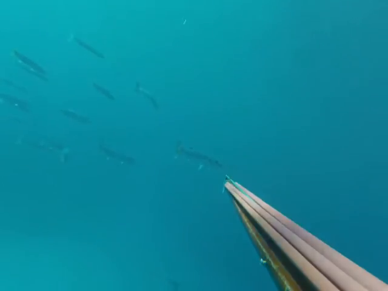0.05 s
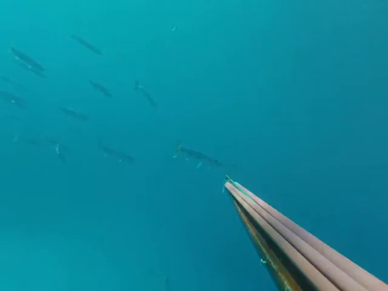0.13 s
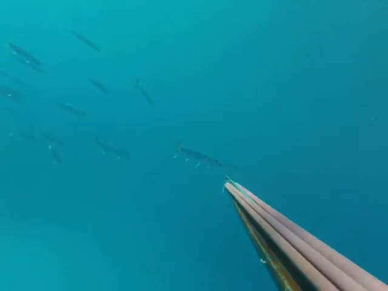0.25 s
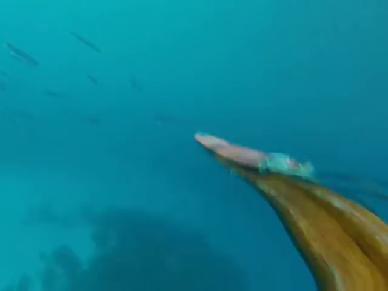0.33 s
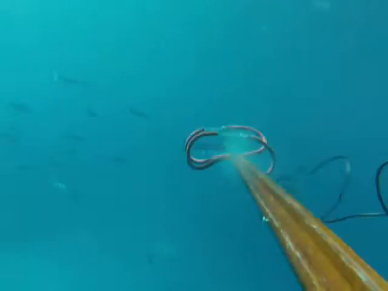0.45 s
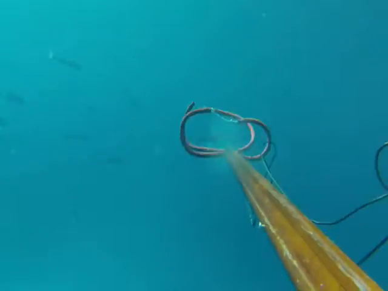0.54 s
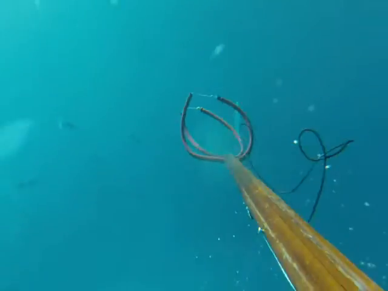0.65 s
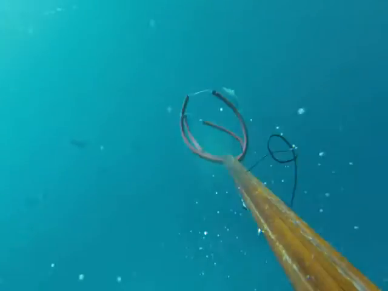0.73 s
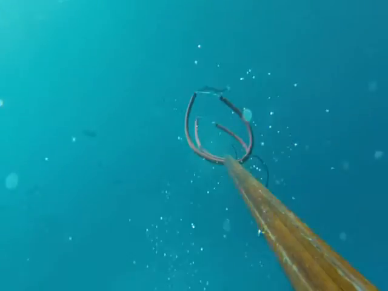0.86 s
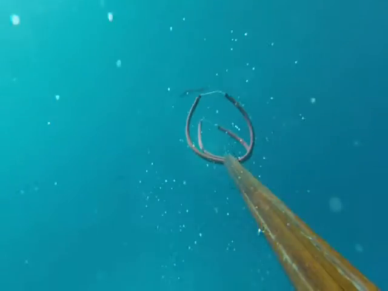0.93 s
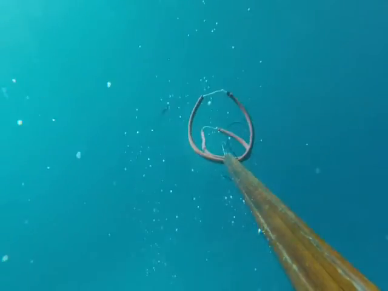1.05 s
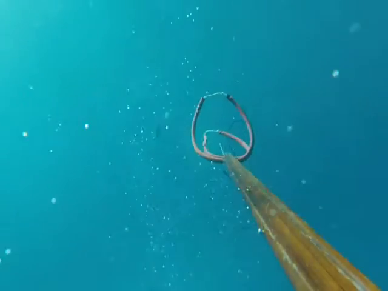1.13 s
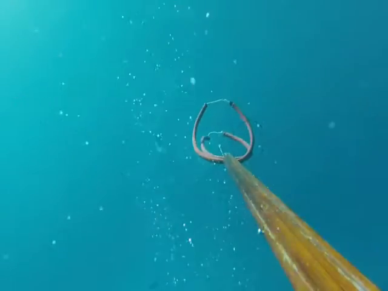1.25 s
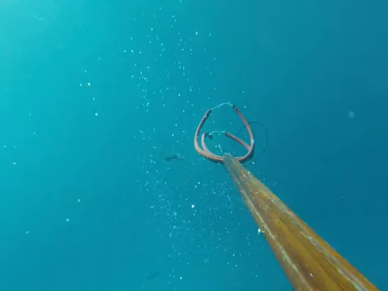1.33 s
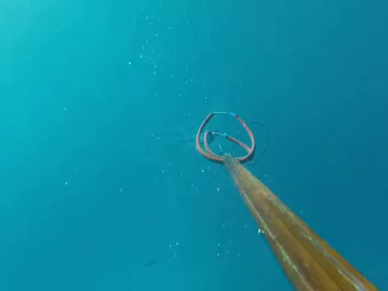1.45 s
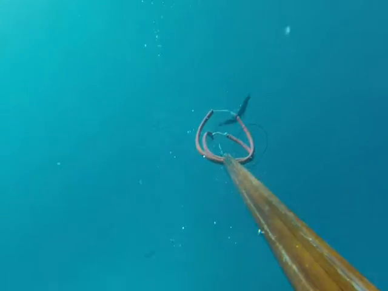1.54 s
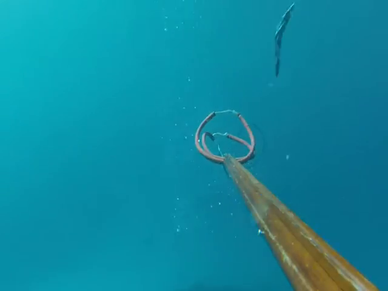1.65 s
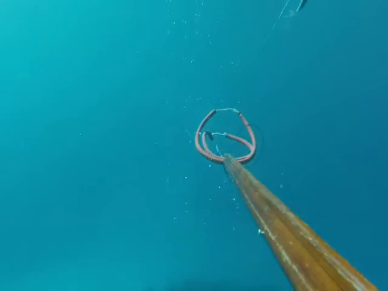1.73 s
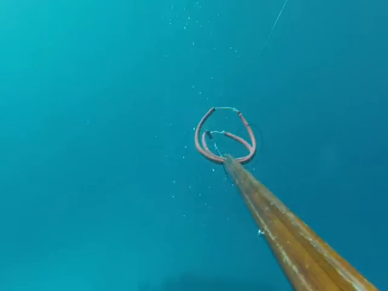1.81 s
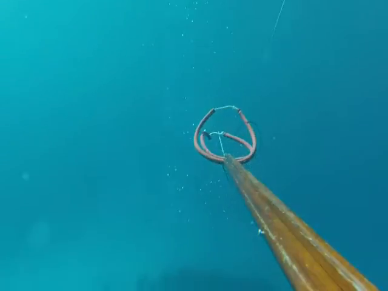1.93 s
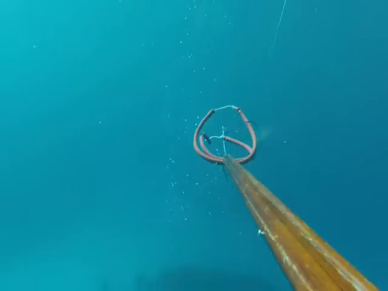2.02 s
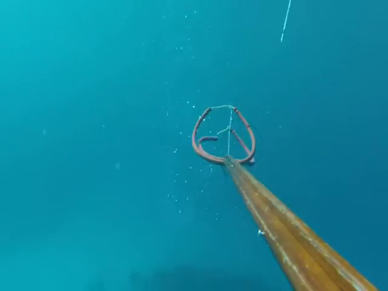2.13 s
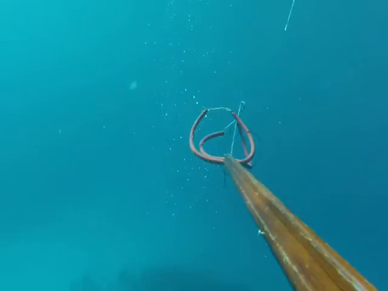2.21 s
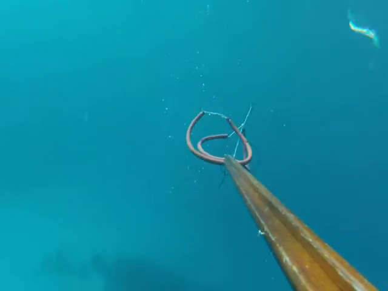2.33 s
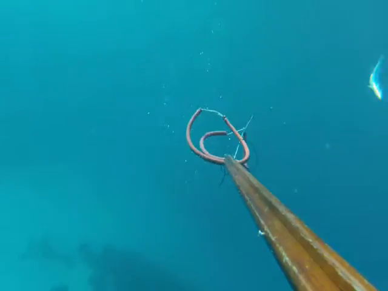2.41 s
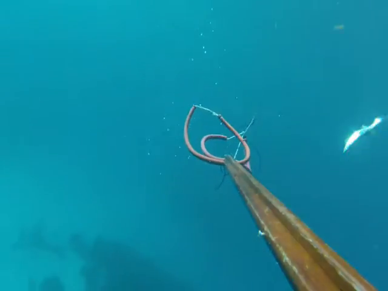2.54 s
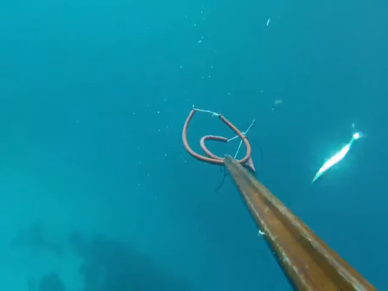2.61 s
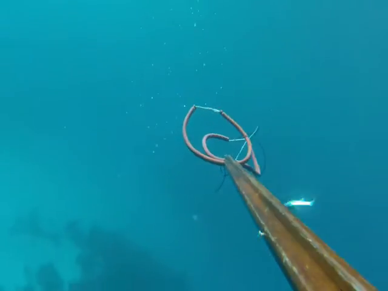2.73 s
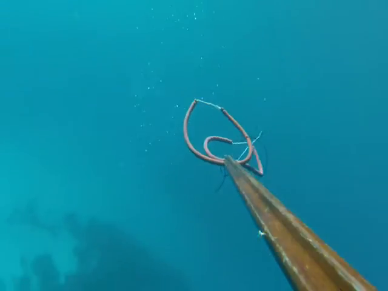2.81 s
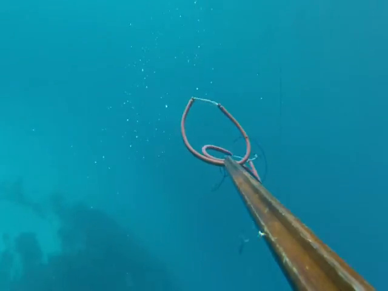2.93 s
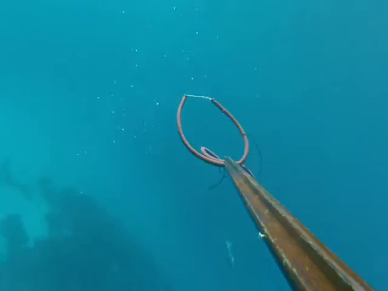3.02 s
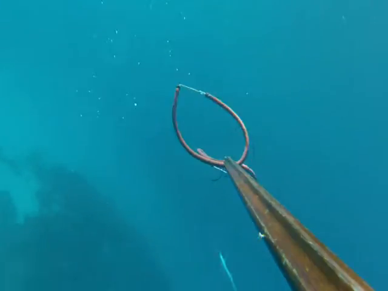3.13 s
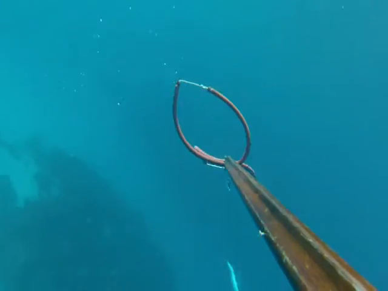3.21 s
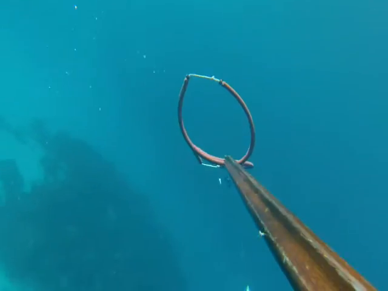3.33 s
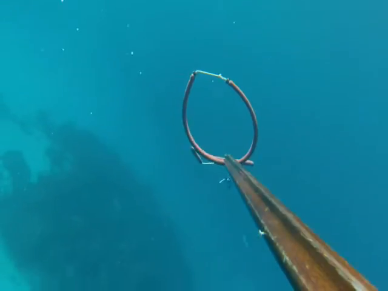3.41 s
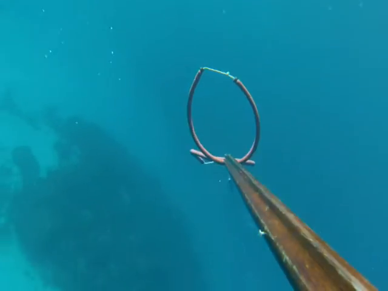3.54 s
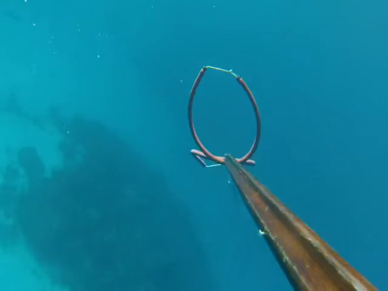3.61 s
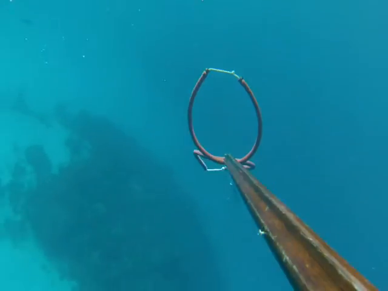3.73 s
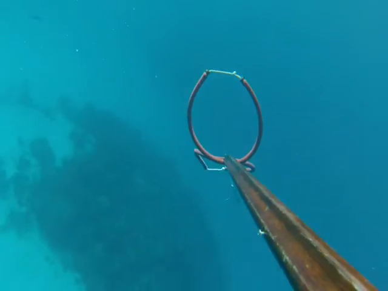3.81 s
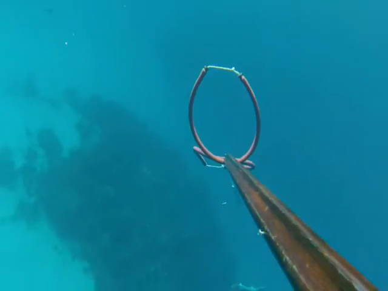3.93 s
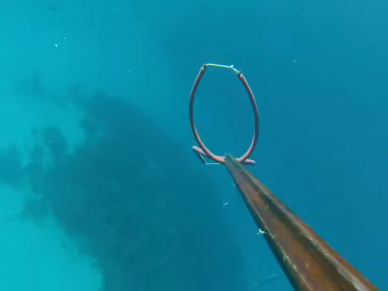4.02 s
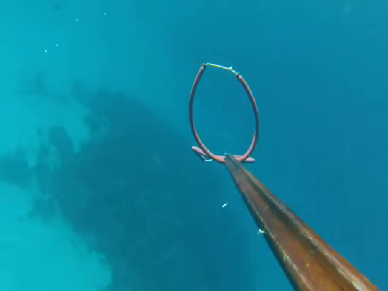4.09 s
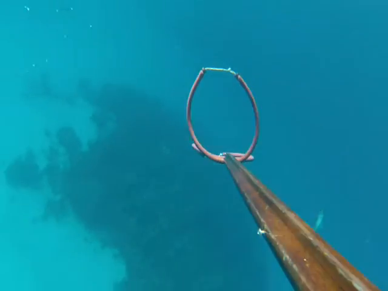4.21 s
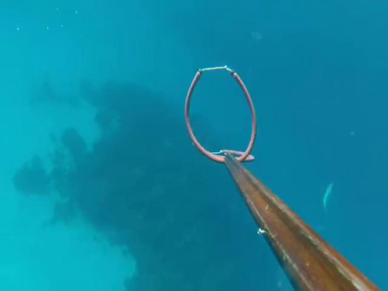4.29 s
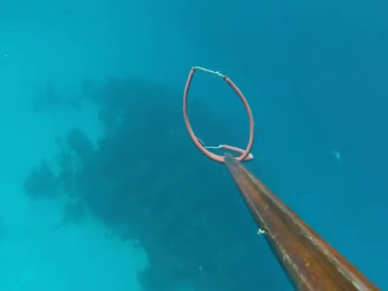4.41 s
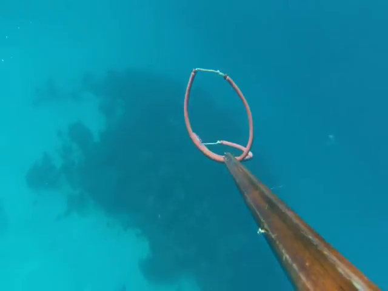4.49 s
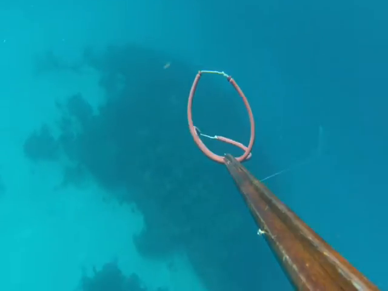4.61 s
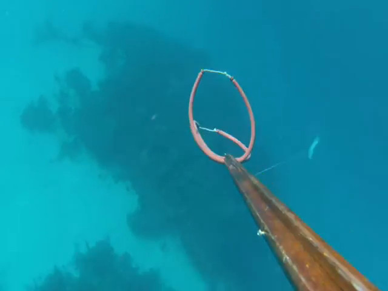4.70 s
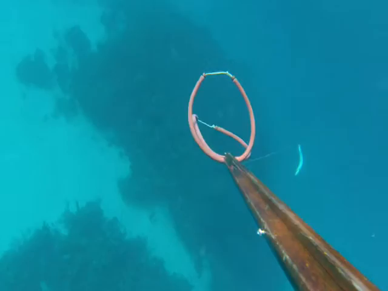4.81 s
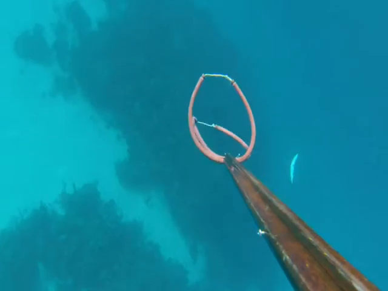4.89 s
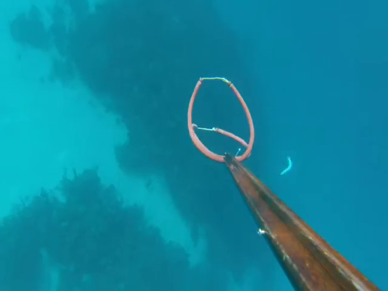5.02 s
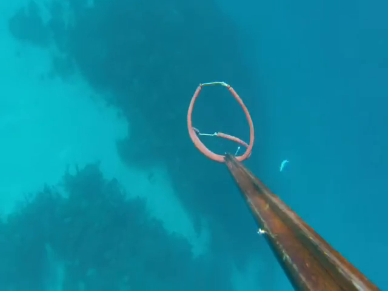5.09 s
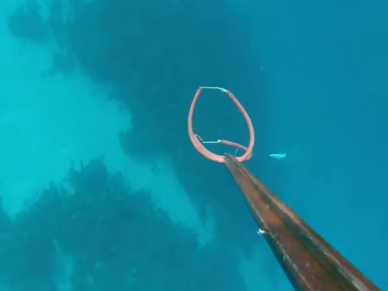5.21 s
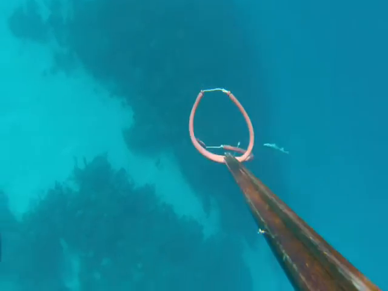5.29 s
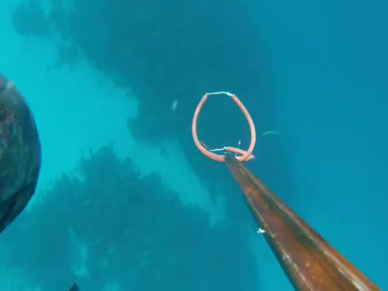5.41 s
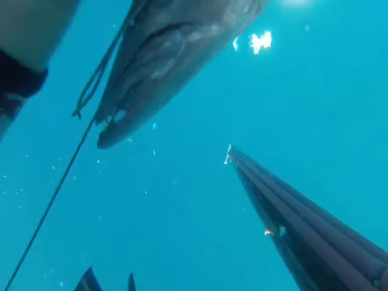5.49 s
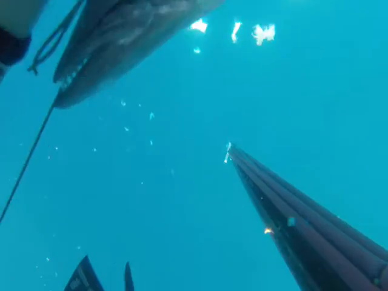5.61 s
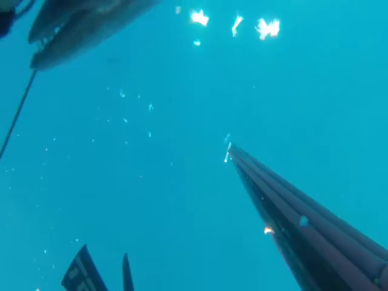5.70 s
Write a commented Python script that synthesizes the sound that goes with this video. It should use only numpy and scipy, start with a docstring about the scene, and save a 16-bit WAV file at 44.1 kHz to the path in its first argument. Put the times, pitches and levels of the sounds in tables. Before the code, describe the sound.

The sound is underwater, picked up from a sealed housing clamped to a speargun's wooden barrel. It opens with faint hiss and a few small dry ticks. At about 0.5 seconds the gun fires: one sharp crack with a deep recoil thump, by far the loudest moment, briefly overloading the microphone. Until about 1.2 seconds the line rattles and chafes on the gun in close, boxy knocks, over a low barrel hum, a wobbling rumble and a faint fizz of bubbles. Sparser knocks and ticks follow, with the hum swelling again near 2.4 seconds. From about 3 to 3.4 seconds comes a stronger cluster of tugs, knocks and rumble. Wet rubber squeaks once, faintly, at 3.6 seconds. Then things settle to light taps, soft scraping and low rumble, and a brief, soft rush of water passes at around 5.6 seconds.

```python
"""A rubber-band speargun fires under water with a sharp crack, heard from on the gun itself: the microphone
is in a camera, in a sealed housing clamped to the wooden barrel. The recoil overloads it and the gain
ducks. Afterwards the line tugs, knocks and chafes on the gun, ringing the housing; the barrel hums and
wobbles. Fine bubbles fizz, wet rubber squeaks once and water rushes past at the end.
Small dry ticks stand out of the hiss of sea and amplifier."""
import sys
import numpy as np
from scipy import signal
from scipy.fft import rfft, irfft
from scipy.io import wavfile
from scipy.ndimage import uniform_filter1d

SR = 44100
rng = np.random.default_rng(int(sys.argv[2]) if len(sys.argv) > 2 else 0)


def dump_mix(stems):
    """Bounce the given channels to the path in sys.argv[1] as a 16-bit WAV at rate SR."""
    frames = np.atleast_2d(stems).T  # one column per channel
    limited = np.clip(frames, -1, 1)  # hard clip at full scale
    pcm = np.round(limited * 32767).astype(np.int16)
    wavfile.write(sys.argv[1], SR, pcm)


N = 253575

# swings of the whole gun (start [s], frequency [Hz], level [dB], t60 [s])
RECOIL_SWINGS = [(0.4889, 100, 8.5, 0.026), (0.4935, 30.5, -7.5, 0.14), (0.541, 161, -15, 0.1)]
# the shot's sharp crack (first row), then clouds of fine fizz
# (start [s], length [s], level [dB], fade [dB/s], metallic ring [dB re level])
CRACK_AND_FIZZ = [(0.4885, 0.0045, -25.5, 1003, -3), (0.492, 0.015, -44.5, 178, -4),
                  (0.926, 0.088, -68.5, 302.5, 7.5), (1.03, 0.065, -67.5, 298.5, 7),
                  (3.318, 0.012, -58, 244, -1)]
# the shot's double crack (0.4905 and 0.4992 s), and small dry ticks
# (time [s], level at 6 kHz [dB], tilt [dB/octave])
CRACK_AND_TICKS = [(.1205, -39.5, -5.5), (0.1249, -41.5, -5), (0.265, -43, 1), (.318, -54, -9),
                   (0.4905, -7, -10.5), (0.4992, -20.5, -5), (.5817, -39.5, 3.5), (0.6693, -32, -4.5),
                   (0.8147, -39.5, -3), (0.919, -50.5, -2.5), (0.938, -47, -4.5), (0.968, -52.5, -9.5),
                   (.992, -51, -0.5), (1.881, -45.5, 10.5), (1.9423, -48.5, -2), (2.379, -36, 1),
                   (2.4, -43.5, 0.5), (2.5735, -47, -5.5), (2.763, -40.5, 6), (2.9004, -45, 11.5),
                   (3.0199, -46.5, -4.5), (3.194, -40.5, -5), (3.2327, -40, -5), (3.3138, -43, 0.5),
                   (3.8162, -45.5, -1), (4.595, -45.5, 13), (4.8005, -37, -8), (5.4798, -50, 6)]
# knocks on the gun
# (time [s], relative strength [dB], upper modes [dB re strength], deep modes [same], contact [ms])
GUN_KNOCKS = [(0.467, -38.5, -3, -26, 13), (0.4888, -2, -4, -32, 1.65), (0.4957, -12, 3, 3, 3.5),
              (0.5063, -28, 7.5, -11, 10.5), (0.5234, -22, -17, -5, 8.4), (0.5409, -15.5, -8, -16, 1.5),
              (0.5646, -27.5, 0, -1.5, 2.1), (0.622, -36, 0.5, 2, 4.24), (0.667, -25, 0.5, -16, 1.4),
              (.698, -30.5, -9.5, -11, 3), (0.745, -42, -21, -17, 2.3), (0.7684, -27.5, -18.5, -34, 1.7),
              (0.8122, -20, -11, -30, 10.7), (0.8501, -28, -19, -13, 4.4), (0.9133, -34.5, -14, -28, 2.3),
              (0.933, -24, -14, -35, 4), (0.9686, -23.5, -19, -36, 1.9), (0.991, -31, -7, -30, 2),
              (1.057, -39.5, -10, -30, 4.3), (1.082, -22, -12, -30, 4), (1.0936, -22, -9.5, -34, 3.7),
              (1.1065, -21, -9, -39, 2.47), (1.12, -17.5, -15.5, -36, 3), (1.179, -43.5, -8.5, -18, 4.6),
              (1.38, -39.5, -5, -7, 1.1), (1.4219, -30, -7.5, -36, 1.22), (1.643, -54.5, -22, 9.5, 2),
              (1.8134, -23, -9.5, -38, 0.96), (1.995, -35.5, -28, -11, 2.8), (2.073, -33, -38.5, -20, 5),
              (2.1598, -31, -27, -9.5, 5.4), (2.3043, -36.5, -18, -18.5, 2.8),
              (2.32, -28.5, -6.5, -23, 1.3), (2.451, -25, -2, -21, 2.35), (2.465, -30, -10, -12, 5.7),
              (2.5719, -35, -7.5, -32, 3.96), (2.9722, -31, -6, -26.5, 5.6), (3.043, -16, -17, -16, 2.6),
              (3.069, -29, -19, -27, 4.6), (3.087, -30, -25, -16, 3.2), (3.184, -33, -4.5, -2, 2.9),
              (3.1911, -18.5, 2.5, -10, 1.78), (3.2009, -15.5, -12, -18, 5.1),
              (3.2341, -27.5, -11, -10.5, 6.3), (3.319, -30, -10, -15, 21), (3.3329, -24, -9.5, -9.5, 10),
              (3.6412, -38, -22.5, -27.5, 4.7), (4.5043, -43.5, -7, 2, 5.6),
              (4.5913, -40.5, -12.5, -30, 5.5), (5.1582, -38, -9.5, 1.5, 5.1), (5.515, -39, -17, -9, 1.34)]
# line chafing on the gun (start [s], length [s], relative level [dB], upper modes [dB re level])
LINE_CHAFES = [(0.508, 0.059, -28.5, -6.5), (0.561, 0.32, -44.5, -7.5), (0.928, 0.11, -32.5, -6),
               (1.093, 0.019, -27, -12), (1.128, 0.35, -52, -9), (1.51, 0.92, -57.5, -9),
               (2.049, 0.029, -35, -22.5), (2.001, 0.65, -49.5, -14.5), (2.286, 0.069, -38, -10.5),
               (2.737, 0.26, -52, -14), (2.972, 0.013, -27, -8.5), (3.032, 0.11, -40, -22),
               (3.18, 0.065, -40, -15), (3.311, 0.057, -33, -16.5), (3.368, 0.27, -44.5, -9.5),
               (4.081, 0.96, -60.5, -13.5)]
# jerks on the line (start [s], length [s], second barrel mode [dB], all modes [dB re second])
LINE_TUGS = [(0.536, 0.0083, -25, 3.5), (0.681, 0.034, -38, -9), (0.946, 0.018, -34.5, -11),
             (1.07, 0.075, -48, -4), (1.364, 0.044, -54.5, 10), (1.834, 0.015, -49, 6),
             (2.148, 0.014, -58, -3), (2.399, 0.016, -31.5, -15), (2.662, 0.011, -37, -11),
             (2.762, 0.011, -40, 0), (2.872, 0.013, -34, -9), (2.974, 0.035, -24.5, -9),
             (3.052, 0.014, -23.5, -19), (3.207, 0.036, -28, 3), (3.338, 0.029, -38, 8),
             (4.61, 0.046, -46, -17), (4.77, 0.036, -37, -21), (4.902, 0.031, -43, -20),
             (5.084, 0.052, -49, -8)]
# barrel hum under the line's steady pull (time [s], level [dB])
HUM_LEVELS = [(0, -93), (.4, -94), (.5, -28.5), (.76, -54), (.86, -35.5), (1.15, -42.5), (1.28, -59.5),
              (1.45, -50), (1.75, -73), (1.95, -58), (2.0, -46), (2.47, -37.5), (2.62, -52.5), (3.0, -42.5),
              (3.42, -43), (3.55, -52.5), (3.96, -66), (4.18, -50.5), (4.3, -59), (4.75, -53.5),
              (5.25, -63.5), (5.75, -66)]
# shaking of the gun (time [s], level [dB])
WOBBLE_LEVELS = [(0, -57), (.36, -51.5), (.49, -48), (.52, -28), (.6, -26.5), (.83, -30), (.97, -37.5),
                 (1.16, -33), (1.45, -57), (1.65, -44.5), (1.8, -54), (2.4, -35), (2.92, -46),
                 (3.14, -29.5), (3.38, -25), (3.52, -37.5), (4.0, -51.5), (4.28, -36), (4.37, -47.5),
                 (4.5, -33), (4.68, -37.5), (5.75, -53.5)]
# glide of the rubber's squeak (time [s], pitch [Hz])
SQUEAK_GLIDE = [(3.58, 2090), (3.605, 1660), (3.63, 2410)]
# thin faint tones (start [s], length [s], level [dB], pitch [Hz])
THIN_TONES = [(1.947, 0.0092, -62, 2780), (2.753, 0.21, -65, 1818)]
# sea and amplifier noise (frequency [Hz], relative density [dB])
HISS_SPECTRUM = [(18, -27.5), (30, -7), (95, -20.5), (233, -19), (426, -22), (1390, -29), (1960, -29),
                 (2540, -32), (11100, -41), (14800, -44.5), (16000, -76.5)]

# modes of the housing, barrel, ticks and fizz (frequency [Hz], gain [dB], t60 [s])
WALL_DEEP = [(903, -1, 0.024), (627, -3.5, 0.026), (358, -4.5, .03)]
WALL_LOW = [(1041.7, -2.5, 0.016), (1160.5, -4, 0.035), (1287.4, -16.5, 0.052)]
WALL_UPPER = [(1438, -1, 0.017), (1706, 2, 0.021), (1930, 2, 0.017), (2301, -2, 0.011)]   # these answer harder contacts
WALL_TREBLE = [(2970, -20.5, 0.0061), (3660, -29, 0.02), (5740, -28, 0.005), (7435, -33.5, 0.0055)]
BARREL_MODES = [(108, -11.5, 0.087), (192.3, 0.5, 0.099), (255, -1, 0.055), (323, -3.5, 0.03)]
TICK_MODES = [(1970, -6, 0.012), (3340, 1, 0.0028), (4030, -7.5, 0.0067), (6020, 4, 0.0027),
              (7266, -1.5, 0.0018), (10800, -5, 0.0022), (13360, -18.5, 0.0014)]
FIZZ_MODES = [(3680, 3, 0.006), (6130, -6, 0.004), (6950, -4.5, 0.0028)]

HOUSING_CUT_HZ = 2700
FRICTION_DB_PER_S, TONE_DB_PER_S = (2500.5, 403), (1195, 1195)   # rise, fall


def recoil():
    """The released bands throw gun and microphone back, then forth and back again."""
    out = np.zeros(N)
    for k, (s, hz, db, t60) in enumerate(RECOIL_SWINGS):
        kick = np.zeros(N)
        kick[round(s * SR)] = -(-1) ** k * from_db(db)
        out += ring(kick, hz, t60)
    return out


def crack_and_fizz(rise_db_per_s=8998):
    """The shot's sharp crack, then clouds of fine fizz: dense pops, some ringing metallically."""
    s, length, db, fall_db_per_s, ring_db = np.transpose(CRACK_AND_FIZZ)
    pops = butter(grains(per_s=2500, spread_db=4.5), 1700, "high")
    pops = butter(pops, 8000, "low", order=5)
    rings = sum(body(grains(per_s=900, spread_db=5), [mode]) for mode in FIZZ_MODES)
    broad, metallic = (swells(s, length, level, rise_db_per_s, fall_db_per_s)
                       for level in (db, db + ring_db))
    return broad * rms_one(pops) + metallic * rms_one(rings)


def crack_and_ticks():
    """The shot's double crack, and small dry ticks close by: short pulses, each with its own colour."""
    s, db, tilt_db = np.transpose(CRACK_AND_TICKS)
    colour_db = 3 * rng.standard_normal((len(s), len(TICK_MODES)))
    contact_ms = 1.8 * 2 ** (tilt_db / 6)   # brighter ones chatter longer
    out = np.zeros(N)
    for k, mode in enumerate(TICK_MODES):
        mode_db = db + tilt_db * np.log2(mode[0] / 6000) + colour_db[:, k]
        out += body(bursts(s, mode_db, contact_ms), [mode])
    return out


def knocks():
    """Line, bands and shaft strike the gun; the housing rings and the barrel thuds faintly."""
    s, db, upper_db, deep_db, contact_ms = np.transpose(GUN_KNOCKS)
    low, deep, upper = (bursts(s, level, contact_ms) for level in (db, db + deep_db, db + upper_db))
    thud = from_db(-13) * body(low, BARREL_MODES)
    return from_db(4.5) * (housing(deep, low, upper) + thud)


def chafing(flutter_db=1.5, flutter_hz=22.09, buzz_db=6.5):
    """The line drags over the wood in small slips, clumped and pulsing at the barrel's hum pitch."""
    s, length, db, upper_db = np.transpose(LINE_CHAFES)
    clumps = from_db(flutter_db * rms_one(butter(rng.standard_normal(N), flutter_hz, "low")))
    hum_hz = BARREL_MODES[1][0]
    buzz = from_db(buzz_db * np.sin(2 * np.pi * hum_hz * np.arange(N) / SR))
    slips = from_db(-22.5) * rms_one(grains(per_s=1700, spread_db=3.5) * clumps * buzz)
    low, upper = (slips * swells(s, length, level, *FRICTION_DB_PER_S) for level in (db, db + upper_db))
    return housing(low * from_db(-8.5), low, upper)


def housing(deep_push, low_push, upper_push):
    """The thick wall around the microphone rings up to the cut; only faint modes sound above it."""
    wall = body(deep_push, WALL_DEEP) + body(low_push, WALL_LOW) + body(upper_push, WALL_UPPER)
    return butter(wall, HOUSING_CUT_HZ, "low", order=8) + body(upper_push, WALL_TREBLE)


def barrel_hum():
    """The line's pull keeps all the barrel's bending modes going; a smooth tug swells the second."""
    every_mode = evened(body(grains(per_s=360, spread_db=5.5), BARREL_MODES), window_s=0.031)
    hz, _, t60 = BARREL_MODES[1]
    second_mode = evened(ring(ring(rng.standard_normal(N), hz, t60), hz, t60), window_s=0.02)
    s, length, db, all_db = np.transpose(LINE_TUGS)
    pure, broad = (swells(s, length, level, rise_db_per_s=700.5, fall_db_per_s=708)
                   for level in (db, db + all_db))
    pull = from_db(in_time(HUM_LEVELS))
    return np.hypot(pull, broad) * every_mode + pure * second_mode


def wobble(hz=21.2, width_hz=2.63):
    """The gun shakes on its grip, with water sloshing in broad low noise beside it."""
    t60 = np.log(1000) / (np.pi * width_hz)
    shake = evened(ring(rng.standard_normal(N), hz, t60), window_s=0.052)
    slosh = from_db(-12.5) * rms_one(butter(rng.standard_normal(N), [30, 130], "band"))
    return from_db(in_time(WOBBLE_LEVELS)) * (shake + slosh)


def squeak(start_s=3.58, length_s=0.043, db=-50):
    """Wet rubber squeaks once: a rough tone whose pitch dips midway."""
    rough = 1 + 0.72 * rms_one(butter(rng.standard_normal(N), 120, "low"))
    tone = np.sin(2 * np.pi * np.cumsum(in_time(SQUEAK_GLIDE)) / SR)
    return swells(start_s, length_s, db, *TONE_DB_PER_S) * tone * rough


def whines():
    """Faint unsteady tones, like a taut line singing: noise through a sharp resonance."""
    noise = rng.standard_normal(N)
    return sum(swells(s, length, db, *TONE_DB_PER_S) * rms_one(ring(ring(noise, hz, 0.029), hz, 0.028))
               for s, length, db, hz in THIN_TONES)


def rush(start_s=5.597, length_s=0.2, deep_db=-60.5, low_db=-67, upper_db=-62.5):
    """Water rushes past the camera: smooth flow noise keeps the housing modes sounding."""
    flow = np.zeros(N)
    for modes, db in (WALL_DEEP, deep_db), (WALL_LOW, low_db), (WALL_UPPER, upper_db):
        wall = body(rng.standard_normal(N), modes)
        flow += from_db(db) * rms_one(butter(wall, 650, "high"))
    return swells(start_s, length_s, 0, *FRICTION_DB_PER_S) * butter(flow, HOUSING_CUT_HZ, "low", order=4)


def crackle():
    """Faint ticks at random moments, down in the hiss."""
    return from_db(-69.5) * body(grains(per_s=58, spread_db=4.5), TICK_MODES)


def hiss(db_over_240_hz=-63.5):
    """The noise floor: steady sea and microphone amplifier."""
    hz, db = np.transpose(HISS_SPECTRUM)
    bins_hz = np.maximum(np.fft.rfftfreq(N, 1 / SR), 1)
    shape = from_db(np.interp(np.log(bins_hz), np.log(hz), db))
    noise = irfft(rfft(rng.standard_normal(N)) * shape, N)
    return from_db(db_over_240_hz) * noise / np.std(butter(noise, 240, "high", order=4))


def bursts(times, levels_db, contact_ms, clean_ms=0.9):
    """Each contact is a click and a dying chatter; those shorter than clean_ms are mostly click."""
    size = 2500
    out, t = np.zeros(N + size), np.arange(size) / SR
    for s, db, ms in zip(times, levels_db, contact_ms):
        length = np.clip(ms, 0.1, 18) / 1000
        chatter = rng.standard_normal(size) * (1 - np.exp(-6 * t / length)) * np.exp(-t / length)
        click_share = np.exp(-ms / clean_ms)
        burst = chatter * np.sqrt((1 - click_share) / np.sum(chatter ** 2))
        burst[round(length * SR / 2)] += np.sqrt(click_share)
        out[round(s * SR):][:size] += from_db(db) * burst
    return out[:N]


def grains(per_s, spread_db):
    """Random clicks of uneven size and sign."""
    sizes = from_db(spread_db * np.minimum(rng.exponential(1, N), 4)) * rng.choice([-1, 1], N)
    return sizes * (rng.random(N) < per_s / SR)


def swells(start_s, length_s, db, rise_db_per_s, fall_db_per_s):
    """Gain in time of events that rise, hold and fall; their powers add."""
    t = np.arange(0, N, 22)[:, None] / SR
    before_s, after_s = np.maximum(start_s - t, 0), np.maximum(t - start_s - length_s, 0)
    level_db = db - rise_db_per_s * before_s - fall_db_per_s * after_s
    power = np.sum(from_db(np.maximum(level_db, -200)) ** 2, axis=1)
    return np.interp(np.arange(N) / SR, t[:, 0], np.sqrt(power))


def ring(push, hz, t60):
    """A unit click sets a sine of height 1 ringing."""
    r, w = from_db(-60 / (t60 * SR)), 2 * np.pi * hz / SR
    return signal.lfilter([0, np.sin(w)], [1, -2 * r * np.cos(w), r * r], push + 1e-18)


def body(push, modes):
    """All modes in parallel, signs alternating."""
    return sum((-1) ** k * from_db(db) * ring(push, hz, t60) for k, (hz, db, t60) in enumerate(modes))


def butter(x, hz, kind, order=2):
    """Butterworth filter."""
    return signal.sosfilt(signal.butter(order, hz, kind, fs=SR, output="sos"), x)


def in_time(table):
    """A (time, value) table as one value a sample."""
    return np.interp(np.arange(N) / SR, *np.transpose(table))


def evened(x, window_s):
    """Running rms held near 1."""
    return x / np.sqrt(uniform_filter1d(x ** 2, size=round(window_s * SR)) + 1e-9)


def rms_one(x):
    """Scaled to rms 1."""
    return x / np.sqrt(np.mean(x ** 2) + 1e-20)


def from_db(db):
    """Gain of a level in dB."""
    return 10 ** (np.asarray(db) / 20)


def scene():
    """Everything reaches the one microphone through the gun and the housing."""
    gun = knocks() + chafing() + squeak() + whines() + barrel_hum() + wobble() + crack_and_ticks()
    return (gun + crackle() + recoil() + rush() + crack_and_fizz() + hiss())[None]


def record(dry, overload=0.87, duck_from_db=-22.5, duck_share=0.26, recover_db_per_s=10, top_hz=16400):
    """The camera's input overloads, its gain ducks after loud sound and creeps back; the top is cut."""
    clipped = dry / (1 + np.abs(dry / overload) ** 8) ** (1 / 8)
    level_db = 10 * np.log10(signal.lfilter([0.001], [1, -0.999], clipped ** 2) + 1e-12)
    duck_db = duck_share * np.maximum(level_db - duck_from_db, 0)
    recovery_db = recover_db_per_s * np.arange(N) / SR
    held_db = np.maximum.accumulate(duck_db + recovery_db, axis=1) - recovery_db
    smooth_db = signal.lfilter([0.0007], [1, -0.9993], held_db)
    top_cut = signal.cheby2(12, 70, top_hz, fs=SR, output="sos")
    return signal.sosfilt(top_cut, clipped * from_db(-smooth_db))


dry = scene()
out = record(dry)
dump_mix(out)
```